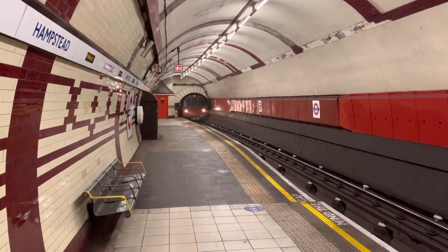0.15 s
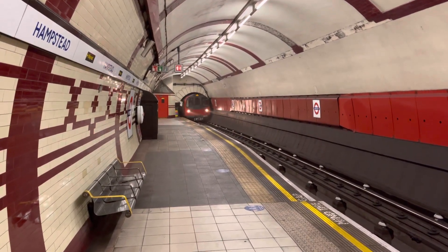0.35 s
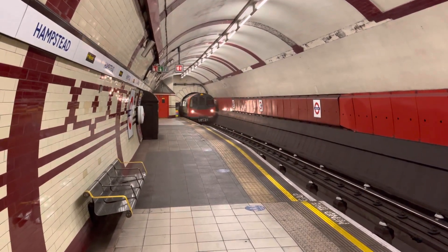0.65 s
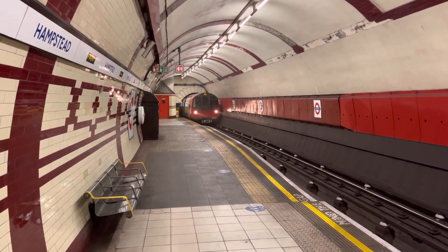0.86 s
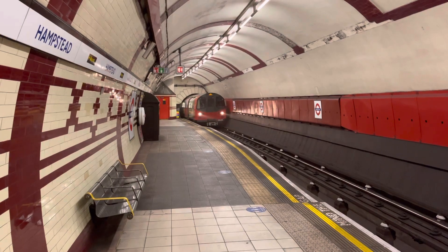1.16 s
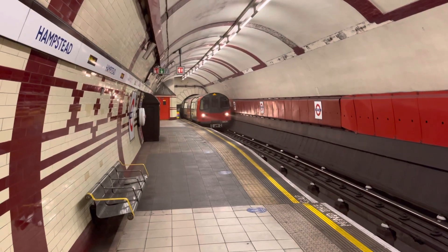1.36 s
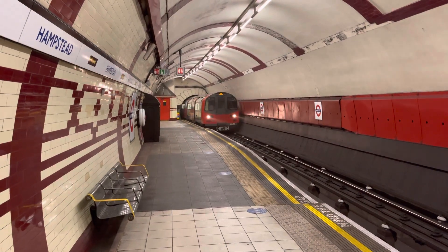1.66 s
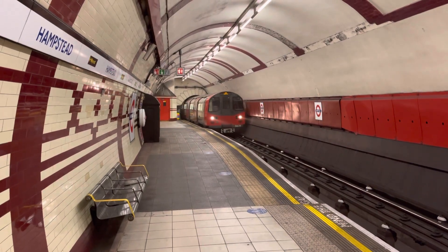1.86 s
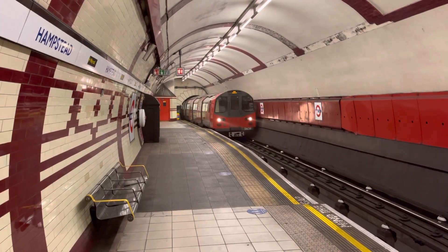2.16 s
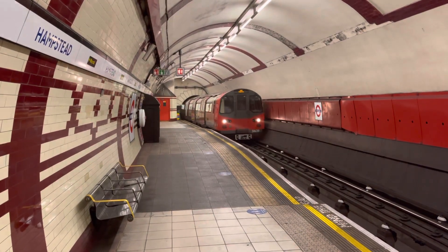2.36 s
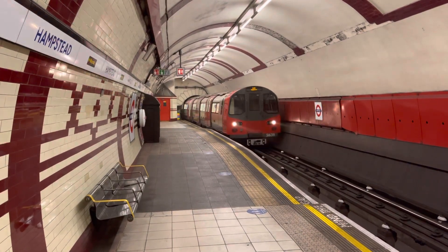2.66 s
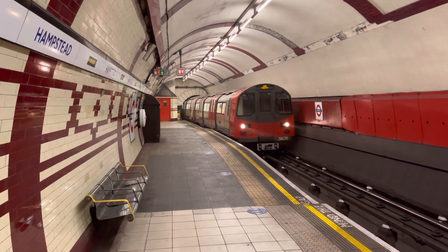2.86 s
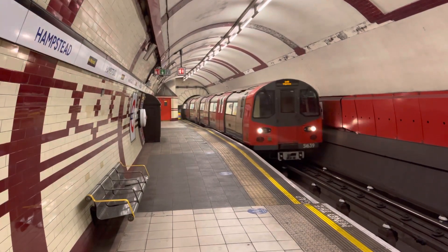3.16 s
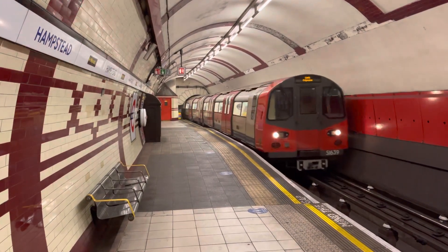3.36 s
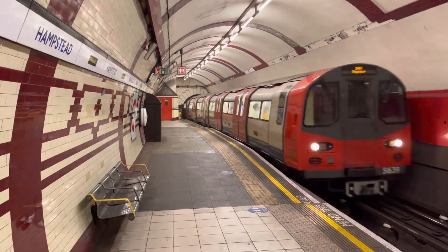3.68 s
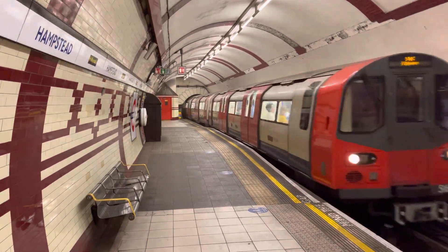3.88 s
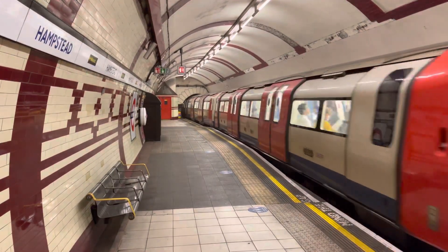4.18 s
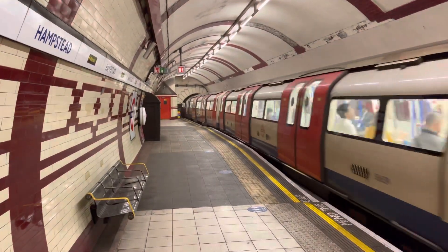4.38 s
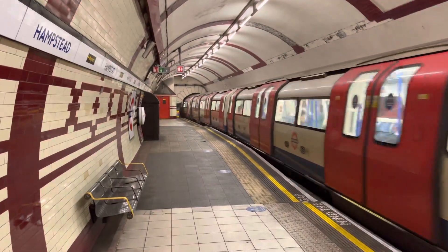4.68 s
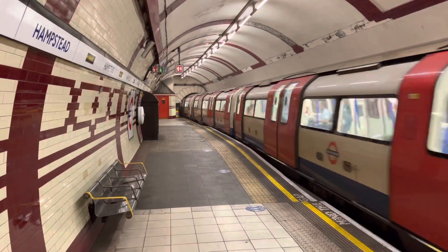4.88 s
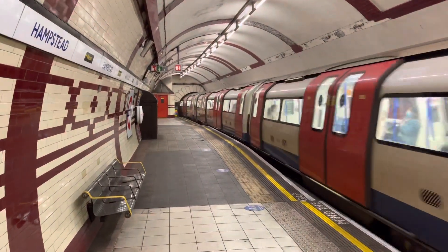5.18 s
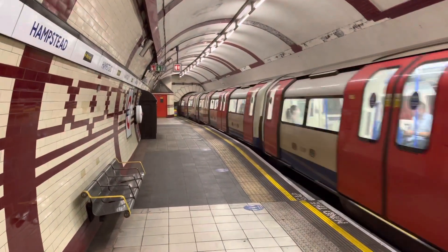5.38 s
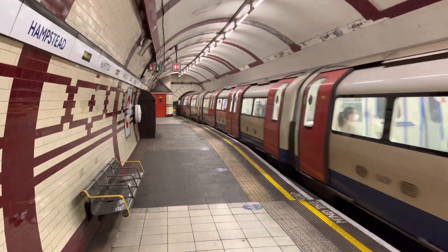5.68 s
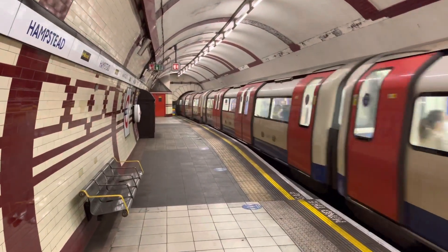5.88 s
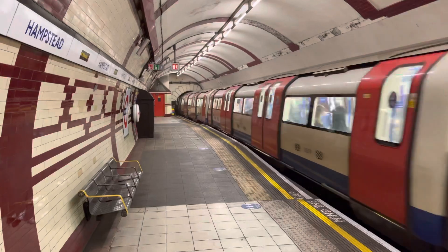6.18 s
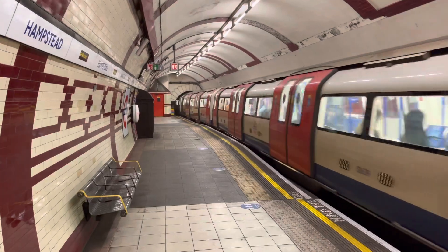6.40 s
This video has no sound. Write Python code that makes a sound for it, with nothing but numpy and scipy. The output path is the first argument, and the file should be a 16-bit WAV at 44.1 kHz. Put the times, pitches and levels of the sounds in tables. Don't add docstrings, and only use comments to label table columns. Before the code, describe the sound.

A burst of steel squeal and hiss opens over deep rumble as a subway train comes out of a tunnel. Wheel roar surges around two seconds, then eases while ground rumble stays heavy. Rail joints knock dully. Near four seconds brief high squeals and fine hissing scrapes come forward as carriages pass. Stereo microphone on a tiled, vaulted platform a few metres from the wheels, with half-second echoes.

```python
import sys
import numpy as np
from scipy import signal
from scipy.io import wavfile
from scipy.ndimage import uniform_filter1d

SR = 44100
rng = np.random.default_rng(int(sys.argv[2]) if len(sys.argv) > 2 else 0)


def volts(x):
    e = np.asarray(x, float) / 20
    return 10 ** e


def inscribe(sig):
    pcm = np.round(np.clip(np.atleast_2d(sig).T, -1, 1) * 32767)
    wavfile.write(sys.argv[1], SR, pcm.astype(np.int16))


N = 288414

# pitch_hz, level_db (per Hz)
GROUND_RUMBLE = [(25, -2), (38, -30), (52, -8.5), (68, -2), (92, -3.5), (125, -7.5), (170, -2.5),
                 (260, -20.5), (500, -68)]
BOGIE_BOOM = [(70, -52), (120, -8), (175, -3), (250, -0.5), (340, -3), (450, -8.5), (700, -51), (1200, -59)]
WHEEL_ROAR = [(150, -79), (300, -9), (430, -1.5), (560, 0), (800, -1.5), (1050, -7), (1400, -14.5),
              (2200, -33), (5000, -65)]
RAIL_RING = [(500, -6.5), (950, -9), (1300, 3), (1600, -2), (2050, -0.5), (2500, -6.5), (3200, -11.5),
             (5000, -23.5), (8000, -56), (13000, -79)]
# pitch_hz, level_db (per Hz)
FLANGE_SCRAPE = [(1200, -13), (2500, -1.5), (3400, 0), (4400, -3), (5300, 1), (6300, -2), (7000, -6),
                 (8200, -10), (10000, -71), (13000, -58)]
FLANGE_HISS = [(5000, -30), (7000, -12), (8500, -9), (9400, -1), (10100, -2.5), (10800, 0), (11500, -5),
               (12200, -11.5), (12700, -18), (13200, -28), (14000, -70)]
# pitch_hz, width_hz, level_db
BODY_MODES = [(95, 55, 10.5), (113, 7.6, 15), (176, 28, 5), (238, 14, 3.5), (345, 44, 4.5), (549, 59, 0),
              (696, 22, 1.5)]
# pitch_hz, width_hz, level_db (against the
WHEEL_MODES = [(3370, 79, -12), (4180, 120, -1.5), (4850, 120, 4.5), (5200, 120, -1.5), (6170, 60, 1),
               (7800, 80, -0.5), (8700, 38, 4), (9550, 69, -20), (11300, 60, 1)]
# start_s, hold_s, surge_db
ROUGH_STRETCHES = [(.01, .03, -21), (.35, 0.1, -22), (.56, .07, -18), (.73, .01, -17.5), (.94, .02, -21.5),
                   (1.2, .01, -24), (1.43, 0.023, -20), (1.58, 0.062, -24.5), (1.85, 0.054, -20),
                   (1.97, .01, -18.5), (2.17, 0.014, -15.5), (2.45, 0.049, -18), (2.71, .01, -17),
                   (3.02, .01, -25), (3.21, .02, -30), (3.43, .02, -21.5), (3.54, 0.048, -25),
                   (3.87, 0.14, -20.5), (4.14, 0.14, -20.5), (4.49, 0.04, -22.5), (4.73, 0.011, -19),
                   (5.13, .01, -24), (5.3, .06, -24.5), (5.5, .01, -25), (5.74, .1, -25.5),
                   (5.95, .09, -22), (6.22, .09, -23.5), (6.49, .1, -24.5)]
# start_s, length_s, pitch_hz, width_hz, level_db
RAIL_JOINTS = [(0.0, .1, 251, 65, -16), (.26, .13, 238, 23, -16), (.28, 0.18, 336.4, 63, -18.5),
               (.5, 0.16, 549, 38, -16.5), (.6, .13, 345, 41, -22), (.64, 0.2, 90.4, 15, -16.5),
               (.58, 0.11, 705, 73, -21), (.55, .18, 424, 49, -29), (1.2, .11, 124, 14, -16),
               (1.42, .11, 92, 15, -17), (1.88, 0.1, 238, 30, -13), (2.07, 0.11, 121, 20, -13.5),
               (2.44, 0.1, 196, 38, -17), (2.44, 0.14, 286, 38, -20), (2.64, 0.15, 260.5, 40, -19.5),
               (3.4, 0.12, 96, 13, -25), (3.86, .12, 176, 12, -10.5), (4.16, 0.12, 202, 15, -21),
               (4.76, .05, 102, 16, -11), (5.56, 0.075, 119, 15, -16), (5.85, 0.39, 345, 48, -22),
               (5.92, 0.17, 760, 220, -27), (6.24, 0.14, 92.5, 9.1, -18)]
# start_s, length_s, pitch_hz, width_hz, level_db
SQUEAL_EVENTS = [(0.0, .13, 4820, 90, -30), (.08, .17, 4810, 75, -37), (0.0, .1, 4170, 120, -42),
                 (0.0, .09, 5510, 80, -42), (.4, .2, 4870, 70, -53), (.63, .1, 2130, 70, -38),
                 (.7, .08, 1900, 60, -34), (1.1, .1, 3790, 90, -48), (.67, .08, 5900, 90, -49),
                 (.89, .1, 9430, 50, -48), (.91, .07, 6650, 70, -50), (1.54, .09, 4840, 50, -54),
                 (2.47, .08, 6240, 60, -52), (2.7, .08, 5230, 60, -47), (3.63, .12, 5420, 110, -39.5),
                 (3.69, .29, 5440, 200, -34), (3.54, .22, 10860, 170, -41), (3.88, .07, 6320, 50, -51),
                 (3.95, .1, 4800, 60, -47), (4.2, .18, 9600, 120, -46), (5.05, .15, 3870, 220, -36),
                 (5.46, .09, 3600, 170, -32)]
# start_s, hold_s, vault_scrape_db, near_hiss_db
FLANGE_GRIPS = [(.02, 0.022, -25, -24), (.46, 0.044, -45, -43.5), (.56, .03, -42, -41),
                (.67, .01, -33.5, -44.5), (.93, 0.28, -36.5, -31.5), (1.06, .01, -31, -34),
                (1.42, .01, -40, -39.5), (1.81, .08, -43.5, -47), (1.92, .02, -38, -46.5),
                (2.1, .01, -36, -39.5), (2.17, 0.0092, -35, -48), (2.49, .01, -37, -37),
                (2.67, .01, -38, -35.5), (2.69, 0.11, -37.5, -42), (3.1, 0.071, -40, -41),
                (3.35, 0.072, -41.5, -42.5), (3.57, 0.1, -41, -39), (3.79, .01, -36, -33.5),
                (3.94, 0.074, -32.5, -29.5), (4.11, .01, -34, -26), (4.2, 0.16, -31, -30.5),
                (4.6, .08, -45, -40), (4.73, 0.39, -38.5, -39.5), (5.08, 0.12, -33, -34),
                (5.35, .02, -36, -31.5), (5.48, .04, -30.5, -30), (5.78, 0.17, -37, -35),
                (5.95, 0.036, -33, -35.5), (6.05, 0.14, -37.5, -44), (6.41, 0.059, -36, -35.5)]
# start_s, peak_db
FLANGE_TICKS = [
    (0.9103, -37),
    (1.2794, -30),
    (2.0802, -39),
    (3.0784, -42),
    (3.3453, -38),
    (4.6194, -37),
    (5.3363, -31),
]
# pitch_hz, likeness (-1 to 1)
DIFFUSE_FIELD = [(60, 0.94), (210, 0.89), (310, 0.85), (470, 0.52), (700, 0.51), (1060, 0.49),
                 (1600, -0.49), (2200, 0.074), (13000, 0.057)]
# pitch_hz, left_minus_right_db
PORT_BALANCE = [(60, 4), (140, 0.5), (700, 2.5), (1200, 2), (1900, -2), (2600, 2), (4600, 4.5), (6300, 2),
                (7200, 3), (8600, 0), (13000, 1)]
# pitch_hz, shared (0 to 1), slip_turns
SHARED_TREBLE = [(6900, 0, -.5), (7700, .6, -.12), (8600, .96, 0), (9500, .99, .29), (10100, 1, .5),
                 (11000, .99, .71), (12100, 1, 1), (13200, .97, 1.2)]
# pitch_hz, level_db
TREBLE_GATE = [(6000, -90), (8000, -86), (9550, -86), (9750, -67.5), (10150, -67), (10800, -72.5),
               (11800, -75), (12900, -76)]

HZ = np.fft.rfftfreq(2048, 1 / SR)
FRAMES = N // 512 + 5


def evened(x):
    return x / np.sqrt(np.mean(abs(x) ** 2) + 1e-20)


def read(points):
    f, value = np.transpose(points)
    return np.interp(np.log(HZ + 1), np.log(f + 1), value)


def modes_db(modes):
    power = sum((volts(db) ** 2 - 1) / (1 + (2 * (HZ - hz) / width) ** 2) for hz, width, db in modes)
    return 10 * np.log10(np.maximum(1 + power, .01))


def bursts_db(events, idle_db, rise_db_per_s, fall_db_per_s, level_column):
    rows, t = np.array(events), np.arange(0, N + 128, 128) / SR
    late = t - rows[:, :1]
    after_hold = np.maximum(late - rows[:, 1:2], 0)
    shape_db = rise_db_per_s * np.minimum(late, 0) - fall_db_per_s * after_hold
    event_power = volts(rows[:, level_column, None] + shape_db) ** 2
    power = volts(idle_db) ** 2 + event_power.sum(0)
    return np.interp(np.arange(N) / SR, t, 10 * np.log10(power))


def treble_pair():
    f, shared, turns = np.transpose(SHARED_TREBLE)
    return np.interp(HZ, f, shared), np.exp(2j * np.pi * np.interp(HZ, f, turns))


def arriving(colour_db, direct, patchy_db, ringing_db):
    a, b, c, d, patches, rings = rng.standard_normal((FRAMES, len(HZ), 6)).T
    patches = uniform_filter1d(patches, size=4, axis=1)
    patches = evened(uniform_filter1d(patches, size=16, axis=0))
    rings = uniform_filter1d(rings, size=10, axis=1)
    rings = evened(uniform_filter1d(rings, size=2, axis=0))

    direct, lag_s = np.clip(direct, 0, 1), 22 / SR
    shared, slip = treble_pair()
    same = (1 - direct) * read(DIFFUSE_FIELD) + direct * np.exp(-2j * np.pi * HZ * lag_s)
    same = ((1 - shared) * same + shared * slip)[:, None]
    left = a + 1j * b
    right = same * left + np.sqrt(np.maximum(1 - abs(same) ** 2, 0)) * (c + 1j * d)

    level_db = colour_db[:, None] + patchy_db * patches + ringing_db * rings
    balance_db = np.array([.5, -.5])[:, None, None] * read(PORT_BALANCE)[:, None]
    z = np.array([left, right]) * volts(level_db) * volts(balance_db)
    return evened(signal.istft(z, nperseg=2048, noverlap=1536)[1][:, :N])


def ringing(events, echo_db):
    out, t = np.zeros((2, N + 2 * SR)), np.arange(SR) / SR
    vault_t60_s = 0.52
    lean = 1.5
    fade = volts(-60 / vault_t60_s / SR)
    shared, slip = treble_pair()
    likeness = (1 - shared) * read(DIFFUSE_FIELD) + shared * slip
    balance_db = np.array([[.5], [-.5]]) * lean * read(PORT_BALANCE)
    for start_s, length_s, hz, width_hz, db in events:
        pole = np.exp(-np.pi * width_hz / SR)
        shiver = rng.standard_normal((2, SR)) + 1j * rng.standard_normal((2, SR))
        for _ in range(2):
            shiver = signal.lfilter([1], [1, -pole], shiver)
        left, other = evened(shiver / abs(shiver) ** 0.7)
        mode_bin = round(hz / HZ[1])
        same = likeness[mode_bin]
        right = same * left + np.sqrt(max(1 - abs(same) ** 2, 0)) * other
        contact = np.sin(np.pi * np.clip(t / length_s, 0, 1) ** .8) ** .9
        echo = volts(echo_db) * signal.lfilter([1 - fade], [1, -fade], contact)
        tone = (np.array([left, right]) * np.exp(2j * np.pi * hz * t)).real * (contact + echo)
        out[:, round(start_s * SR):][:, :SR] += volts(db + balance_db[:, mode_bin, None]) * tone
    return out[:, :N]


def rolling():
    body_db = modes_db(BODY_MODES)
    smooth_db = -23.5
    surge_db = bursts_db(ROUGH_STRETCHES, smooth_db, 60, 62.5, level_column=2) - smooth_db
    ground = volts(-21 + 0.18 * surge_db)
    bogie = volts(-20.5 + 0.52 * surge_db)
    wheel = volts(-23.5 + 1.28 * surge_db)
    rail = volts(-28.5 + 0.87 * surge_db)
    arrival_s, far_ground_db = 3.1, -3.5
    ground = ground * volts(far_ground_db * np.clip(1 - np.arange(N) / SR / arrival_s, 0, 1))

    rumble = ground * arriving(read(GROUND_RUMBLE) + body_db, .03, .3, 0.97)
    boom = bogie * arriving(read(BOGIE_BOOM) + body_db, 0.033, 0.24, 0.75)
    roar = wheel * arriving(read(WHEEL_ROAR) + body_db, 0.21, 0.26, 2.4)
    ring = rail * arriving(read(RAIL_RING), 0.23, 1.04, 1.93)
    return rumble + boom + roar + ring


def rail_joints():
    return ringing(RAIL_JOINTS, echo_db=-7)


def squeals():
    return ringing(SQUEAL_EVENTS, echo_db=-9)


def flange_scrape():
    wheel_db = modes_db(WHEEL_MODES)
    scrape = volts(bursts_db(FLANGE_GRIPS, -49, 150, 44.5, level_column=2))
    scrape = scrape * arriving(read(FLANGE_SCRAPE) + wheel_db, 0.21, 1.5, 3.0) * volts(2.5)
    hiss = volts(bursts_db(FLANGE_GRIPS, -49.5, 328, 83, level_column=3))
    hiss = hiss * arriving(read(FLANGE_HISS) + wheel_db, 0.21, 2.6, 1.8) * volts(-1.0)
    return scrape + hiss


def flange_ticks():
    ticks, t = np.zeros(N + SR), np.arange(600) / SR
    for start_s, peak_db in FLANGE_TICKS:
        click = evened(np.diff(rng.standard_normal(len(t) + 2), 2))
        ticks[round(start_s * SR):][:len(t)] += volts(peak_db - 4 - 60 * t / .012) * click
    return ticks[:N]


def scene():
    return rolling() + rail_joints() + squeals() + flange_scrape() + flange_ticks()


def gated(x):
    mid_side = np.array([x[0] + x[1], x[0] - x[1]]) / 2
    z = signal.stft(mid_side, nperseg=2048, noverlap=1536)[2]
    power = uniform_filter1d(abs(z) ** 2, size=16, axis=1)
    power = uniform_filter1d(power, size=2, axis=2)
    band = np.minimum(np.arange(len(HZ)) // 16 * 16 + 8, len(HZ) - 1)

    treble_db = 10 * np.log10(power[:, (HZ > 9000) & (HZ < 11500)].mean((0, 1)) + 1e-12)
    memory = .88
    treble_db = signal.lfilter([1 - memory], [1, -memory], treble_db + 66) - 66
    roar_db = 10 * np.log10(power[0, HZ < 3000].mean(0) + 1e-12)
    waver = uniform_filter1d(rng.standard_normal(power.shape), size=3, axis=2)
    waver_db = 2.5 * evened(waver)[:, band]

    limit_db = read(TREBLE_GATE)[:, None] + .7 * (treble_db + 66) + .6 * (roar_db + 38) + waver_db
    limit_db = limit_db + np.array([0, -5])[:, None, None]
    keep = power[:, band] > volts(limit_db) ** 2
    mid, side = signal.istft(z * keep, nperseg=2048, noverlap=1536)[1][:, :N]
    return np.array([mid + side, mid - side])


def roll_off(x):
    return signal.sosfilt(signal.butter(12, 13200, fs=SR, output="sos"), x)


def record(dry):
    wind_filter = signal.butter(5, 54.3, "high", fs=SR, output="sos")
    cut = signal.sosfilt(wind_filter, dry)
    ceiling = 1.4
    limited = ceiling * np.tanh(cut / ceiling)
    return roll_off(gated(limited))


dry = scene()
out = record(dry)
inscribe(out)
```